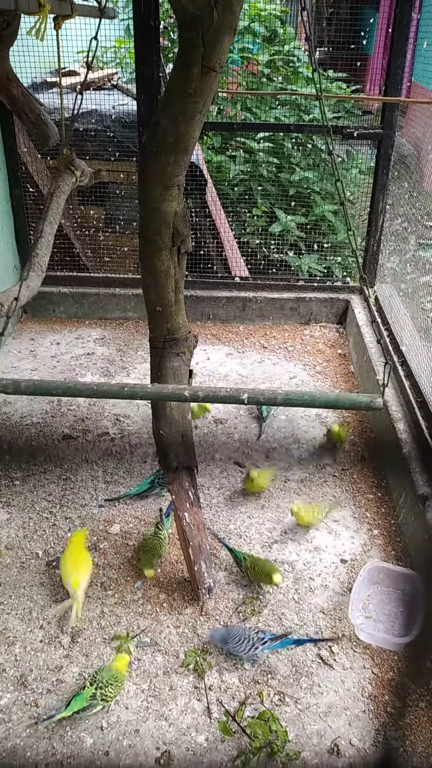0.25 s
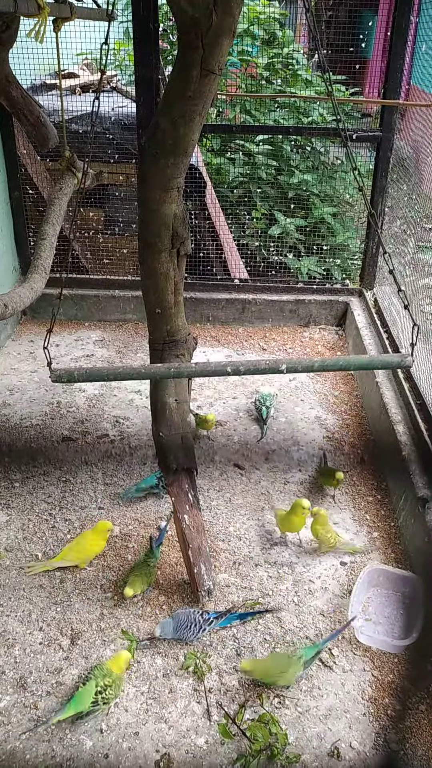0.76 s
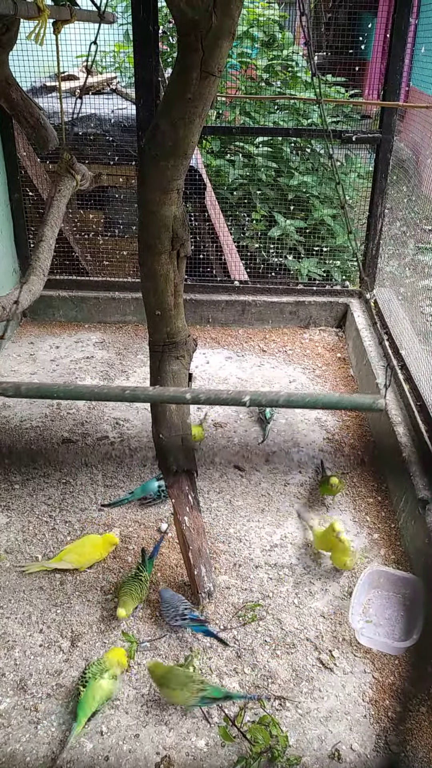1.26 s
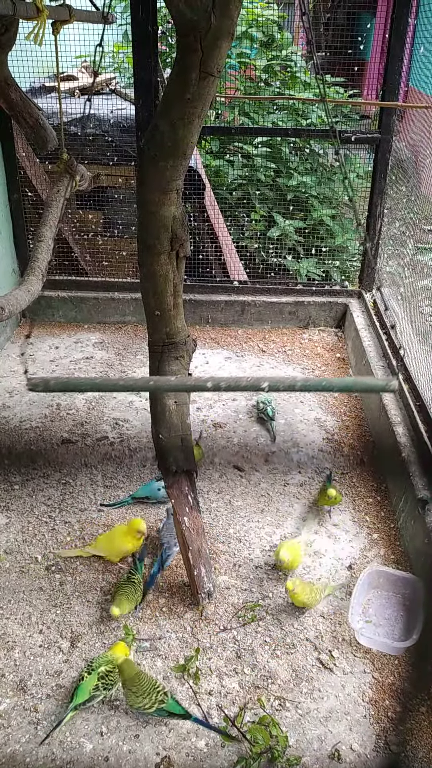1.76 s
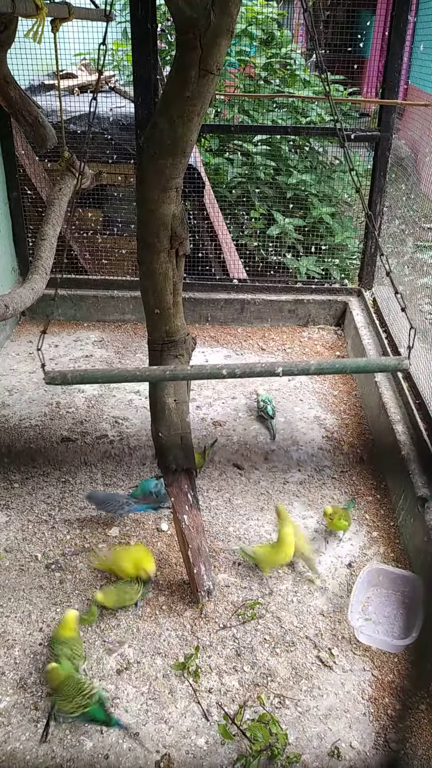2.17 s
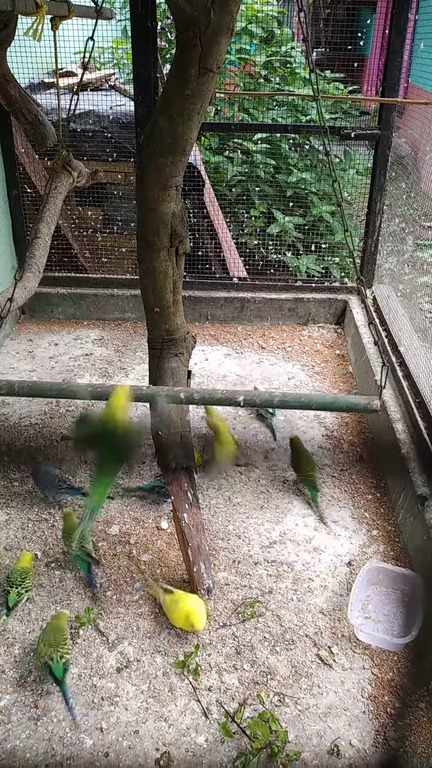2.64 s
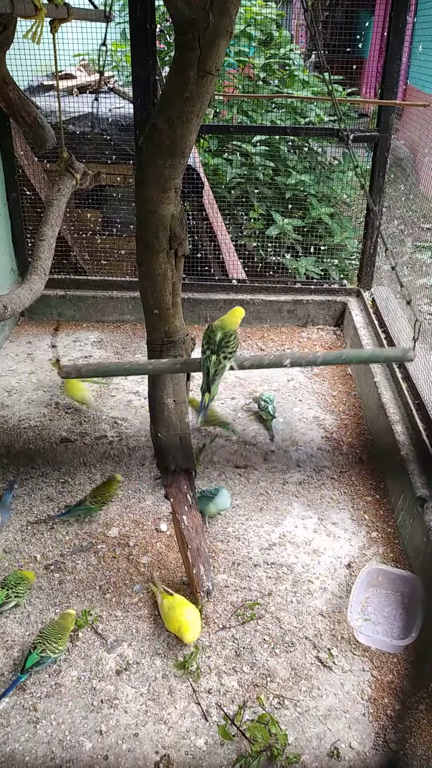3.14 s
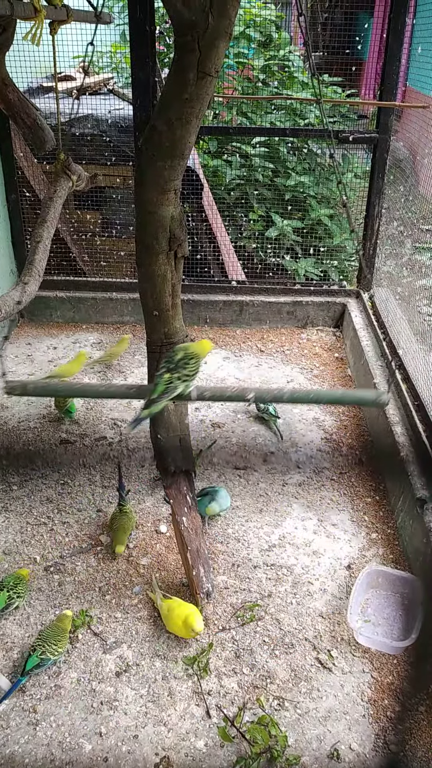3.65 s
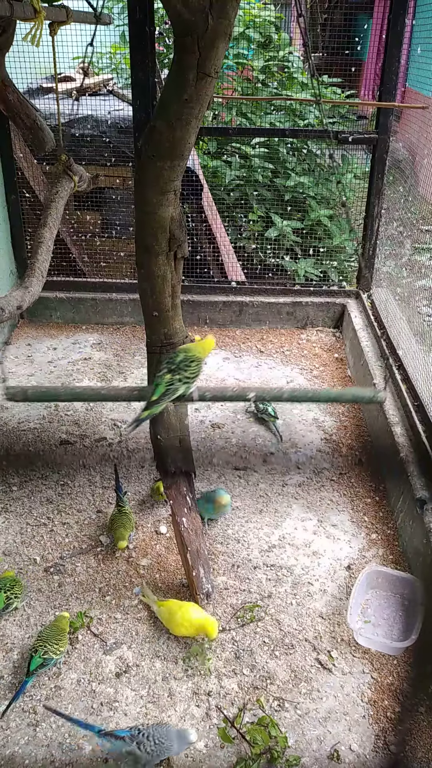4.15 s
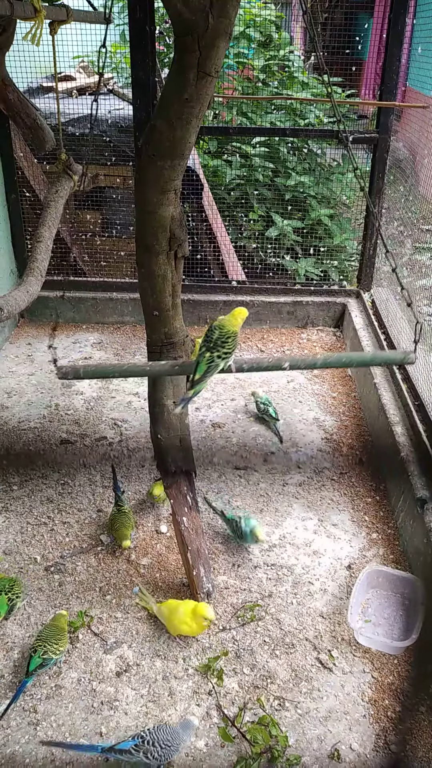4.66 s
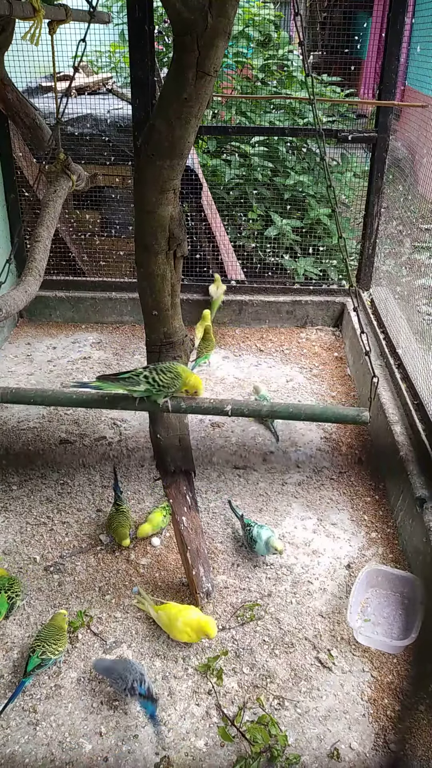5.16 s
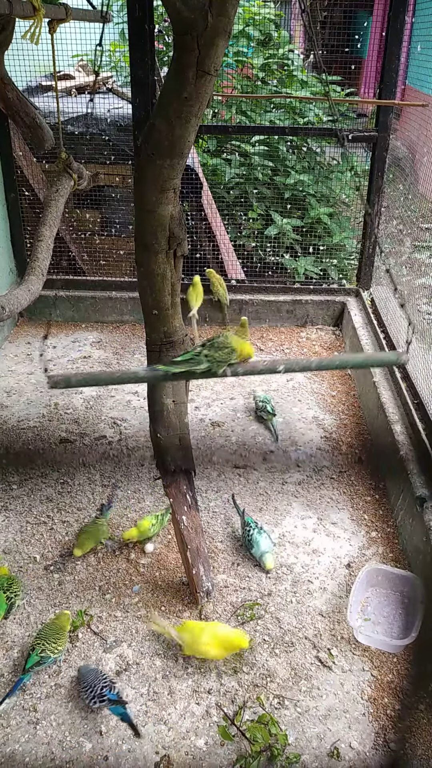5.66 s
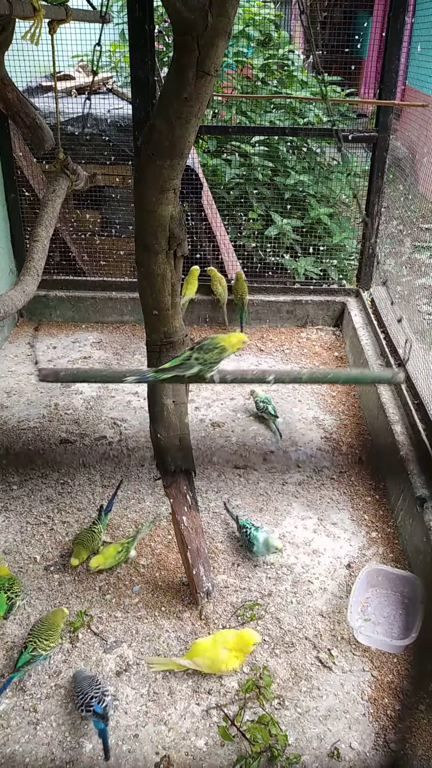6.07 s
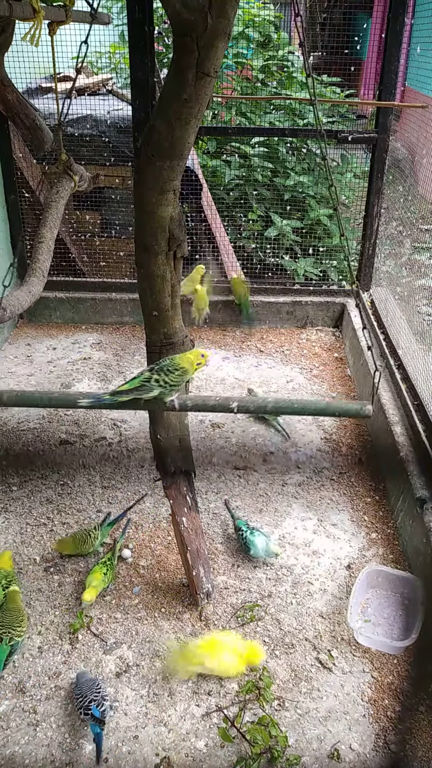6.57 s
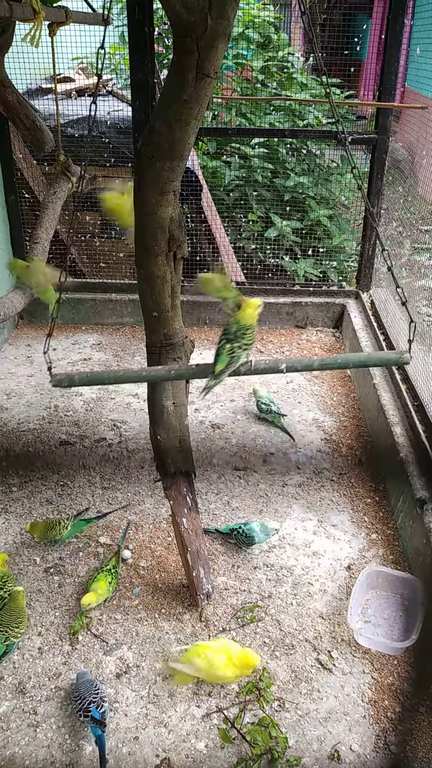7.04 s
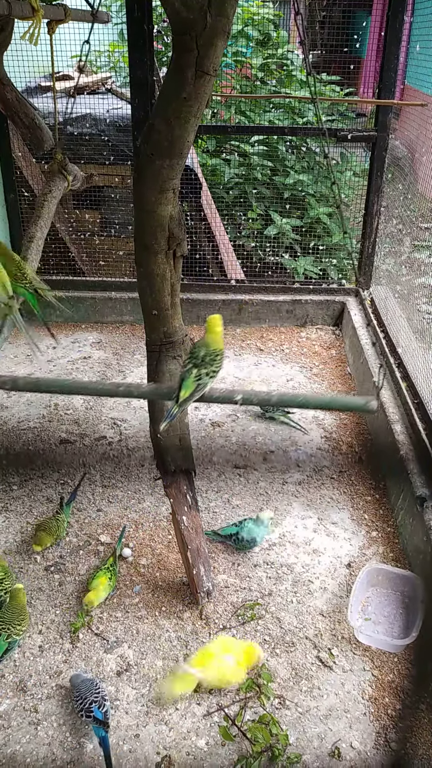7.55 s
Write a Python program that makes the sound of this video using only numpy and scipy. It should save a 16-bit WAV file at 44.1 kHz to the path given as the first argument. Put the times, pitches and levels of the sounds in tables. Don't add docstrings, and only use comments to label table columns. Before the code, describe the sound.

Small parrots chirp and warble sparsely in a hard-floored aviary, then one close bird scolds in regular harsh squawks before a bright closing chatter.

```python
import sys
import numpy as np
from scipy import signal
from scipy.fft import rfft, irfft, next_fast_len
from scipy.io import wavfile
from scipy.ndimage import uniform_filter1d

SR = 44100
rng = np.random.default_rng(int(sys.argv[2]) if len(sys.argv) > 2 else 0)


def master(y):
    cut = np.clip(np.atleast_2d(y).T, -1, 1)
    pcm = np.round(cut * 32767)
    wavfile.write(sys.argv[1], SR, pcm.astype(np.int16))


def decibels_to_gain(level_db):
    exponent = np.asarray(level_db, float) / 20
    return 10 ** exponent


N = 344421

# pitch in Hz, level in dB per Hz.
SCRAPE_COLOUR = [(1060, -28.5), (1800, -21.5), (3530, 4.5), (4820, -11), (5910, -8), (7640, -10),
                 (8970, -9), (13800, -19), (15000, -45)]


def evened(x):
    return x / np.sqrt(np.mean(x ** 2) + 1e-20)


def read(points, hz):
    f, value = np.transpose(points)
    return np.interp(np.log(hz + 1), np.log(f + 1), value)


def add(mix, s, sound):
    part = mix[round(s * SR):][:len(sound)]
    part += sound[:len(part)]


def columns(rows):
    s, *rest = np.transpose(rows)
    t = np.arange(s[0], s[-1], 1 / SR)
    return s[0], [np.interp(t, s, c) for c in rest]


def coloured(x, db_of_hz):
    size = next_fast_len(x.shape[-1] + 512)
    gain = decibels_to_gain(db_of_hz(np.fft.rfftfreq(size, 1 / SR)))
    return irfft(rfft(x, size) * gain, size)[..., :x.shape[-1]]


def resonate(x, hz, width_hz):
    turn = np.exp(2j * np.pi * np.cumsum(hz * np.ones(len(x))) / SR)
    r = np.exp(-np.pi * width_hz / SR)
    return 2 * (turn * signal.lfilter([1 - r], [1, -r], x / turn + 1e-18)).real


def wander(count, size):
    return evened(uniform_filter1d(uniform_filter1d(rng.standard_normal(count), size), size))


def swell(start, length, rise):
    return np.interp(np.arange(N) / SR, [start, start + rise * length, start + length], [0, 1, 0])


def air():
    # pitch in Hz, level in dB per Hz.
    rumble_colour = [(8.8, -37), (15, 27), (44, 5.5), (223, -7.5), (282, -16), (513, -24.5), (770, -13.5),
                     (1110, -13.5), (2500, -35.5), (3250, -82), (5500, -120)]
    wing_colour = [(100, -18), (200, -1), (350, 2.5), (600, -1), (1100, -29), (2000, -48)]
    rustle_colour = [(880, -29), (1500, -11), (1620, -9.5), (2520, -7), (2860, -6.5), (5510, -8.5),
                     (9360, -0.5), (14000, -7.5), (15000, -58)]
    # pitch in Hz, likeness from 0 to 1.
    likeness = [(60, 0.8), (240, 0.96), (940, 0.057), (3710, 0.054), (14700, 0.079)]
    # time in seconds, rustle in dB.
    stir = [(0, -58.5), (0.278, -69.5), (1.43, -64), (1.718, -63), (2.11, -65.5), (2.43, -53.5),
            (2.96, -57.5), (3.83, -64.5), (4.48, -62.5), (4.631, -51), (5.11, -57.5), (5.96, -51),
            (6.04, -55.5), (6.939, -59), (7.219, -61), (7.35, -55.5), (7.81, -63)]
    # start in seconds, length in seconds, level in dB.
    flights = [
        (2.334, 0.53, -64.5),
        (3.378, 2.1, -74),
        (5.94, 0.75, -68),
        (6.51, 0.9, -66),
        (7.12, 0.25, -66),
    ]
    frames, hz = N // 256 + 5, np.fft.rfftfreq(1024, 1 / SR)
    a, b, c, d, patches = rng.standard_normal((frames, 513, 5)).T
    patches = evened(uniform_filter1d(uniform_filter1d(patches, 14, 0), 8, 1))
    patch_db = 3.1 * patches * np.minimum(hz / 900, 1)[:, None]
    same = np.clip(read(likeness, hz), -1, 1)[:, None]
    left = a + 1j * b
    right = same * left + np.sqrt(1 - same ** 2) * (c + 1j * d)
    z = np.array([left, right]) * decibels_to_gain(patch_db)
    wind = decibels_to_gain(-66.5) + decibels_to_gain(-73) * np.minimum(3 * swell(6, 1.47, 0.64), 1)
    wings = decibels_to_gain(-80) + sum(decibels_to_gain(db) * swell(s, length, 0.22) for s, length, db in flights)
    rustle = decibels_to_gain(np.interp(np.arange(N) / SR, *np.transpose(stir)))
    out = 0
    for colour, level, flicker_db in ((rumble_colour, wind, .4), (wing_colour, wings, 2.2),
                                      (rustle_colour, rustle, 1.9)):
        shaped = z * decibels_to_gain(read(colour, hz)[:, None] + flicker_db * wander(frames, size=3))
        noise = evened(signal.istft(shaped, nperseg=1024, noverlap=768)[1][:, :N])
        out = out + noise * level
    return out


def squawk(colour, start, loudest, end, effort_db, throat_db, beak, steady=0.57, beak_db=-8.0,
           release=1, sides_db=-30):
    loudest = max(loudest, start + .002)
    end = max(end, loudest + .008)
    t = np.arange(start, end, 1 / SR)
    hold_end = max(end - release, loudest + .001)
    effort = np.sin(np.pi / 2 * np.interp(t, [start, loudest, hold_end, end], [.1, 1, 1, 0]))
    effort = effort ** np.where(t < loudest, 1.05, 2.2)
    turns = np.cumsum(800 * np.exp(.4 * wander(len(t), size=90))) / SR
    sizes = decibels_to_gain(4.0 * rng.standard_normal(400))[turns.astype(int) % 400]
    breath = (steady + sizes * np.exp(-(turns % 1) / 0.29)) * rng.standard_normal(len(t))
    ripple_db = 2.6 * wander(count=60, size=1)
    ripple_hz = np.linspace(0, 15000, num=60)
    voice = coloured(breath, lambda hz: read(colour, hz) + np.interp(hz, ripple_hz, ripple_db))
    lower = coloured(voice, lambda hz: -np.clip((hz - 4500) / 15, 0, 60))
    beak = beak * (0.935 + 0.1 * effort + 0.062 * wander(len(t), size=300))
    rings = [(1, 900, 900, beak_db), (.5, 1180, 1140, sides_db), (1.5, 1180, 1140, sides_db),
             (.32, 470, 450, sides_db - 12.5)]
    upper = evened(voice - lower)
    for ratio, width_1, width_2, db in rings:
        ring = resonate(resonate(breath, ratio * beak, width_1), ratio * beak, width_2)
        upper = upper + decibels_to_gain(db) * evened(ring)
    call = evened(upper) + decibels_to_gain(min(throat_db, -4)) * evened(lower)
    call = coloured(call, lambda hz: -11. * np.exp(-((hz - 3200) / 200) ** 2)
                    - 4.2 * np.exp(-((hz - 4560) / 150) ** 2))
    return start, decibels_to_gain(effort_db) * call * effort


def chips(mix):
    # start in seconds, length in seconds, effort in dB, rise in seconds.
    chip_rows = [(0, 0.23, -56.5, 0.0034), (0.101, 0.045, -43.5, .009), (1.447, 0.025, -47.5, 0.0079),
                 (1.511, 0.024, -40.5, .008), (1.574, 0.022, -30.5, 0.013), (1.587, .022, -37.5, 0.0047),
                 (1.772, 0.05, -44, 0.0089), (1.848, 0.018, -47.5, 0.011), (1.912, 0.021, -45, 0.0024),
                 (1.977, 0.047, -48.5, .003), (2.329, 0.05, -42, 0.014), (4.199, 0.018, -49, .005),
                 (7.176, .02, -42, .006), (7.182, .014, -27, .002), (7.189, 0.028, -33, .002),
                 (7.505, 0.035, -46, .013), (7.545, 0.022, -40, .003), (7.655, .035, -43.5, 0.0026)]
    for s, length, db, rise in chip_rows:
        add(mix, *squawk(SCRAPE_COLOUR, s, s + rise, s + length, db, throat_db=-9, beak=9000,
                         beak_db=-3.0, steady=0.084))


def whistle(overtone_db, slope_db, flutter, rows, ring_db=0):
    start, (hz, level_db) = columns(rows)
    flutter = np.clip(flutter, 0, 1)
    phase = 2 * np.pi * np.cumsum(hz * (1 + 0.082 * flutter * wander(len(hz), size=70))) / SR
    tone = np.sin(phase)
    overtones = min(int(13000 / hz.min()), 8) * (overtone_db > -39)
    for k in range(2, 2 + overtones):
        beak_db = -7. * np.maximum(k * hz - 8500, 0) / 1000
        beak_db = beak_db + ring_db * np.exp(-((k * hz - 7900) / 1000) ** 2)
        level = decibels_to_gain(overtone_db + slope_db * (k - 4) + beak_db)
        tone = tone + level * np.sin(k * phase) * (k * hz < SR / 2)
    chop = np.maximum(1 + 1.4 * flutter * wander(len(hz), size=60), 0)
    fades = signal.windows.tukey(len(hz), .4)
    return start, np.sqrt(2) * decibels_to_gain(level_db) * tone * evened(chop) * fades


def stroke(start, length, from_hz, to_hz, db, overtone_db, slope_db, flutter, fade_db=0):
    rows = [(start, from_hz, db), (start + length + .003, to_hz, db - fade_db)]
    return whistle(overtone_db, slope_db, flutter, rows)


def husky_strokes(mix):
    # start in seconds, length in seconds, first pitch in Hz, last pitch in Hz, level in dB.
    husky_rows = [(0, 0.053, 5300, 3160, -58), (0.027, 0.042, 3830, 3450, -59.5),
                  (0.049, 0.052, 2320, 2640, -63), (0.08, 0.035, 2786, 2315, -54),
                  (0.103, .034, 3290, 1706, -47.5), (0.082, 0.028, 4210, 3260, -50),
                  (0.1, 0.041, 5170, 3420, -51), (0.775, 0.038, 3770, 3200, -59.5),
                  (0.859, 0.05, 1946, 1414, -64.5), (0.979, .02, 5530, 4650, -66),
                  (1.584, 0.31, 1400, 2070, -71), (1.639, 0.11, 2690, 1970, -66),
                  (2.135, 0.044, 3150, 2700, -68), (2.226, 0.025, 2850, 3800, -54),
                  (2.426, 0.049, 2820, 4020, -57.5), (2.469, .03, 2930, 3680, -62),
                  (2.509, 0.031, 3660, 2470, -60), (6.467, 0.03, 3710, 2920, -51.5),
                  (6.502, 0.018, 4330, 3520, -51), (6.506, 0.027, 1700, 2410, -58),
                  (6.55, 0.076, 2920, 3430, -50), (6.581, 0.049, 3420, 3860, -43.5),
                  (7.301, .012, 4670, 4300, -45), (7.322, 0.032, 3430, 3850, -38.5),
                  (7.398, 0.0285, 3496, 3220, -42), (7.473, 0.05, 2850, 1840, -62)]
    for s, length, from_hz, to_hz, db in husky_rows:
        add(mix, *stroke(s, length, from_hz, to_hz, db + 3.0, -24.5, -6.5, 0.633, fade_db=4.0))


def clear_strokes(mix):
    # start in seconds, length in seconds, first pitch in Hz, last pitch in Hz, level in dB.
    clear_rows = [(0.195, 0.018, 2770, 2520, -44.5), (0.208, 0.014, 2750, 3180, -44.5),
                  (0.223, 0.018, 2760, 2410, -50), (0.232, 0.0074, 3230, 3500, -45),
                  (0.759, 0.015, 3670, 3600, -59.5), (0.775, 0.013, 3690, 2570, -59),
                  (0.793, 0.039, 3420, 2540, -58.5), (0.823, 0.045, 2360, 2170, -60.5),
                  (0.993, 0.016, 4800, 4570, -55), (1.002, 0.025, 4170, 4040, -47.5),
                  (1.063, 0.022, 2570, 2640, -58.5), (1.087, 0.025, 2495, 1550, -56.5),
                  (2.158, .018, 3910, 3800, -53.5), (2.246, .033, 3950, 3780, -51.5),
                  (2.255, 0.051, 2920, 2385, -45), (2.494, 0.026, 4030, 4060, -54),
                  (5.012, 0.043, 3910, 3580, -47.5), (6.49, 0.017, 2610, 2350, -54.5),
                  (6.534, 0.02, 4030, 4180, -43.5), (7.274, 0.02, 3000, 3020, -31.5),
                  (7.304, 0.015, 4070, 3940, -27.5), (7.349, .011, 3066, 3040, -26.5),
                  (7.357, .014, 3034, 2960, -30.5), (7.371, 0.027, 3110, 3510, -35.5),
                  (0.079, 0.0086, 5080, 3570, -56), (.038, .012, 4600, 3570, -56)]
    for s, length, from_hz, to_hz, db in clear_rows:
        add(mix, *stroke(s, length, from_hz, to_hz, db - 1.5, -25, 0.5, 0.1))


def murmurs(mix):
    # start in seconds, length in seconds, pitch in Hz, level in dB.
    murmur_rows = [(0.14, 0.036, 2260, -62.5), (1.009, 0.13, 1876, -64.5), (1.109, 0.18, 1903, -69.5),
                   (1.484, 0.056, 2116, -66.5), (2.166, 0.08, 1980, -68), (2.181, 0.064, 2930, -60),
                   (2.203, 0.025, 3850, -72), (2.295, 0.032, 3476, -43), (2.302, .06, 2890, -50.5),
                   (3.143, 0.12, 1950, -75), (3.234, 0.14, 1145, -71.5), (3.41, 0.032, 2340, -66.5),
                   (3.436, 0.034, 1870, -68.5), (6.157, 0.019, 1990, -62.5), (6.41, 0.04, 3620, -60.5),
                   (6.441, 0.023, 1920, -66), (7.253, 0.025, 4410, -46), (7.323, 0.043, 2200, -52.5),
                   (7.393, 0.02, 3800, -39), (7.434, 0.025, 3220, -46), (7.526, 0.052, 3180, -59.5)]
    for s, length, hz, db in murmur_rows:
        add(mix, *stroke(s, length, hz, hz, db + 4.5, -14.0, 0, 0.757, fade_db=6.0))


def tick(db, hz, t60):
    t = np.arange(2000) / SR
    burst = rng.standard_normal(len(t)) * decibels_to_gain(-60 * t / max(t60, .002))
    burst = coloured(burst, lambda f: -30. * (f < 1800)) + 19.0 * resonate(burst, hz, 1600)
    return decibels_to_gain(db) * burst / abs(burst).max()


def ticks(mix):
    # start in seconds, peak level in dB, ring in Hz, time to fall by 60 dB in seconds.
    tick_rows = [
        (0.38, -58, 2540, 0.015),
        (0.393, -47.5, 8240, 0.015),
        (0.5322, -56.5, 2170, 0.047),
        (2.117, -42, 8000, 0.0058),
        (2.506, -51, 3930, 0.04),
        (3.1352, -38.5, 9800, 0.017),
        (3.2585, -44.5, 10200, 0.072),
        (3.353, -43.5, 9000, 0.014),
        (7.643, -50, 8400, 0.0067),
    ]
    for s, *knock in tick_rows:
        add(mix, s, tick(*knock))


def scrapes(mix):
    # start in seconds, length in seconds, effort in dB.
    scrape_rows = [(0.758, 0.15, -57), (0.988, 0.079, -56), (1.636, 0.04, -38.5), (2.137, 0.057, -49),
                   (2.187, 0.049, -42), (2.22, 0.074, -40.5), (2.275, 0.12, -46.5), (4.084, 0.088, -50.5),
                   (6.471, 0.17, -49.5), (7.247, 0.073, -36.5), (7.299, 0.054, -37.5),
                   (7.374, 0.088, -48.5)]
    for s, length, db in scrape_rows:
        add(mix, *squawk(SCRAPE_COLOUR, s, s + 0.019, s + length, db, throat_db=-8.5, beak=8450,
                         beak_db=1.0, steady=0.13))


def held_notes(mix):
    # start in seconds, length in seconds, pitch in Hz, level in dB.
    held_rows = [
        (0.944, 0.51, 10500, -97.5),
        (1.314, 0.25, 986, -69.5),
        (1.785, 0.026, 2190, -56.5),
        (2.02, 0.081, 1335, -67.5),
        (2.624, 0.094, 486, -67.5),
        (2.63, 0.093, 2670, -66.5),
        (3.095, 0.057, 1166, -66),
        (4.376, 0.087, 1170, -64.5),
    ]
    for s, length, hz, db in held_rows:
        add(mix, *stroke(s, length, hz, hz, db + 2, -28, -3, 0.13, fade_db=3))


def buzz(mix):
    # start in seconds, length in seconds, first pitch in Hz, last pitch in Hz, level in dB.
    buzz_row = (1.8, .035, 1075, 1085, -73)
    add(mix, *stroke(*buzz_row, overtone_db=13.8, slope_db=3.0, flutter=0.078))


def reedy_strokes(mix):
    # start in seconds, length in seconds, first pitch in Hz, last pitch in Hz, level in dB.
    reedy_rows = [(1.848, 0.022, 2240, 2650, -61.5), (1.98, 0.02, 2323, 2650, -57),
                  (2.209, 0.024, 3820, 3880, -62), (4.746, 0.017, 3210, 2780, -61),
                  (4.754, 0.029, 2800, 2700, -58), (3.466, 0.033, 2264, 2340, -65),
                  (3.495, 0.03, 2290, 1810, -71.5), (4.191, .015, 5420, 5220, -56.5)]
    for s, length, from_hz, to_hz, db in reedy_rows:
        add(mix, *stroke(s, length, from_hz, to_hz, db + 3.5, -1.5, -3.5, 0.11))


def thud(db, hz, t60):
    t = np.arange(3000) / SR
    attack = np.minimum(t / 0.0012, 1)
    return decibels_to_gain(db - 60 * t / max(t60, .01)) * np.sin(2 * np.pi * hz * t) * attack


def thuds(mix):
    # start in seconds, peak level in dB, ring in Hz, time to fall by 60 dB in seconds.
    thud_rows = [
        (2.425, -56.5, 420, .05),
        (2.448, -52.5, 520, 0.045),
        (2.502, -49.5, 340, 0.038),
        (2.504, -52, 1010, 0.028),
        (2.533, -52, 425, .05),
        (2.57, -61, 200, .05),
    ]
    for s, *knock in thud_rows:
        add(mix, s, thud(*knock))


def arched_call(mix):
    # time in seconds, pitch in Hz, level in dB.
    arch = [
        (2.785, 1676, -57),
        (2.815, 1764, -56),
        (2.83, 1943, -60),
        (2.85, 2418, -55),
        (2.878, 2540, -50),
        (2.921, 2590, -53.5),
        (2.94, 2210, -55),
        (2.965, 2050, -49),
    ]
    reedy_close = [
        (2.95, 1920, -53),
        (2.966, 1925, -61),
        (2.978, 1960, -55),
        (2.986, 2100, -67),
        (2.996, 2182, -63),
        (3.006, 2000, -57),
        (3.013, 1880, -66),
        (3.024, 1700, -60),
        (3.042, 1600, -64),
    ]
    add(mix, *whistle(-10, 5, 0.14, arch))
    add(mix, *whistle(0, 4, .08, reedy_close, ring_db=15))


def far_motor(mix):
    # time in seconds, pitch in Hz, level in dB.
    motor_rows = [
        (3.2, 1110, -89),
        (4.09, 1063, -89),
        (4.53, 1182, -83),
        (7.64, 1318, -82),
        (7.81, 1314, -108.5),
    ]
    add(mix, *whistle(-60, -10, .1, motor_rows))


def far_song(mix):
    # time in seconds, pitch in Hz, level in dB.
    song_rows = [
        (3.96, 1450, -55),
        (4.049, 1944, -71.5),
        (4.2, 2034, -70),
        (4.272, 3050, -71),
        (4.329, 1895, -57),
        (4.381, 1506, -51),
    ]
    add(mix, *whistle(-22, -.1, 0.79, song_rows))


def scolding(mix):
    # start in seconds, length in seconds, effort in dB, beak resonance in Hz, rise in seconds.
    squawk_rows = [(4.432, 0.058, -30, 8260, 0.02), (4.508, 0.091, -31, 7560, 0.042),
                   (4.629, 0.095, -31, 7400, 0.046), (4.805, 0.077, -20, 7500, 0.022),
                   (4.923, 0.083, -17.5, 8000, 0.037), (5.061, .095, -19.5, 7200, 0.022),
                   (5.218, 0.12, -20.5, 7520, 0.028), (5.39, 0.1, -21, 7400, .024),
                   (5.545, 0.11, -19.5, 7100, 0.047), (5.716, 0.11, -21, 7700, .026),
                   (5.875, 0.1, -22.5, 7430, 0.027), (6.025, 0.1, -29.5, 7400, 0.055),
                   (6.096, 0.072, -34, 9000, 0.021), (6.25, .11, -25, 7520, 0.039),
                   (6.586, 0.066, -31.5, 8460, .016), (6.691, 0.048, -28.5, 7040, 0.023)]
    # pitch in Hz, level in dB per Hz.
    rasp_colour = [(820, -96), (1400, -54), (1760, -28.5), (2350, -31.5), (3100, -16.5), (4090, -10.5),
                   (4470, -19), (5400, -17.5), (5620, -13), (7200, -8.5), (13100, -16.5), (14600, -25),
                   (15000, -67)]
    for s, length, db, beak, rise in squawk_rows:
        throat_db = -11.5 - 0.83 * (db + 30)
        add(mix, *squawk(rasp_colour, s, s + rise, s + length, db, throat_db, beak,
                         release=.04, sides_db=-23.5))


def path(near_db, tail_db, lag):
    # pitch in Hz, time to fall by 60 dB in seconds.
    echo_times = [(1500, 0.27), (4000, 0.19), (9000, 0.18), (14000, 0.15)]
    taps = np.zeros((2, SR // 2))
    at = np.arange(300, SR // 2 - 20, 20) + rng.integers(0, 20, (2, (SR // 2 - 301) // 20))
    np.put_along_axis(taps, at, rng.choice([-1., 1.], at.shape), 1)
    hz, t, z = signal.stft(taps, SR, nperseg=256)
    tail = signal.istft(z * decibels_to_gain(-60 * t / read(echo_times, hz)[:, None]), SR, nperseg=256)[1]
    out = decibels_to_gain(tail_db) * tail / np.linalg.norm(tail[0])
    early = decibels_to_gain(near_db) / np.sqrt(8) * rng.choice([-1., 1.], (2, 8))
    np.put_along_axis(out, rng.integers(22, 300, (2, 8)), early, 1)
    out[0, lag] = out[1, 0] = 1
    return out / np.linalg.norm(out[0])


def walls(x, near_db, tail_db, lag, moves_per_s=12):
    turn = moves_per_s * np.arange(N) / SR
    out = 0
    for k in range(4):
        share = np.cos(np.pi / 2 * np.clip((turn - k + 2) % 4 - 2, -1, 1))
        echoes = path(near_db, tail_db, lag)
        out = out + signal.oaconvolve((x * share)[None], echoes, axes=1)[:, :N]
    return out


def scene():
    background = air()
    harsh, flock = np.zeros((2, N))
    for source in (chips, scrapes, scolding):
        source(harsh)
    for source in (husky_strokes, clear_strokes, murmurs, ticks, held_notes, buzz, reedy_strokes, thuds,
                   arched_call, far_motor, far_song):
        source(flock)
    aside = decibels_to_gain(0.5) * walls(harsh, near_db=6, tail_db=-3.5, lag=20)
    front = decibels_to_gain(1.97) * walls(flock, near_db=-3, tail_db=-10, lag=2, moves_per_s=3)
    return aside + front + background


def top_cut(x):
    return signal.sosfilt(signal.butter(12, 15270, fs=SR, output="sos"), x)


def record(dry):
    # pitch in Hz, left minus right in dB.
    port_difference = [(60, 1), (150, 0.5), (380, 0), (940, 1), (2350, 0), (5870, -3.5), (14700, 15)]

    def port_db(hz):
        difference = np.array([[.5], [-.5]]) * (read(port_difference, hz) - 0.87 * (hz > 3000))
        treble_loss = 7.2 * np.clip((hz - 10000) / 3000, 0, 1)
        return difference - treble_loss - np.clip((hz - 14120) / 22, 0, 60)

    ports = coloured(dry, port_db)
    thump = coloured(ports ** 2, lambda hz: -2.5 - 17 * np.log2(1 + hz / 18))
    return top_cut(ports + thump - thump.mean())


dry = scene()
out = record(dry)
master(out)
```